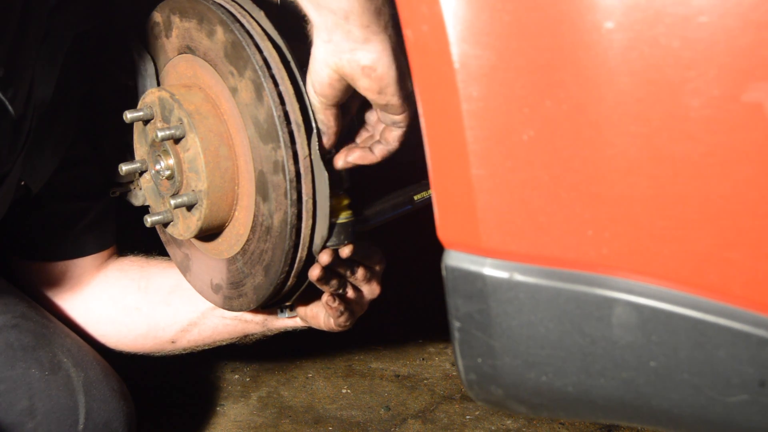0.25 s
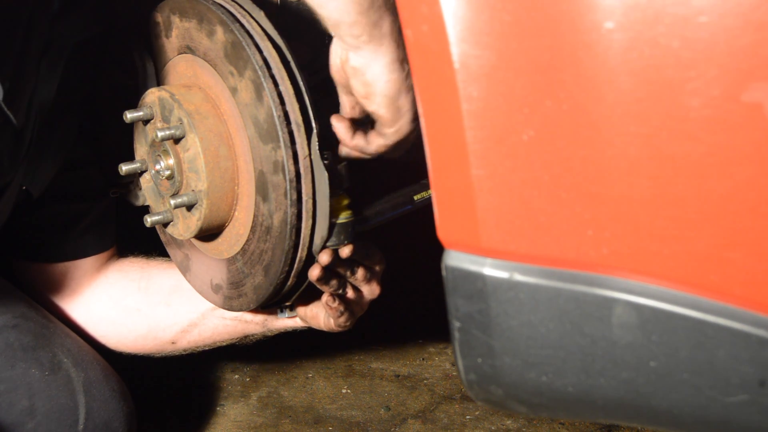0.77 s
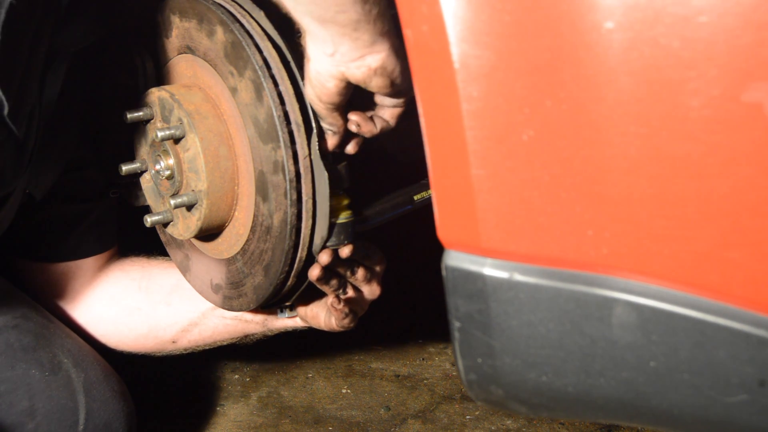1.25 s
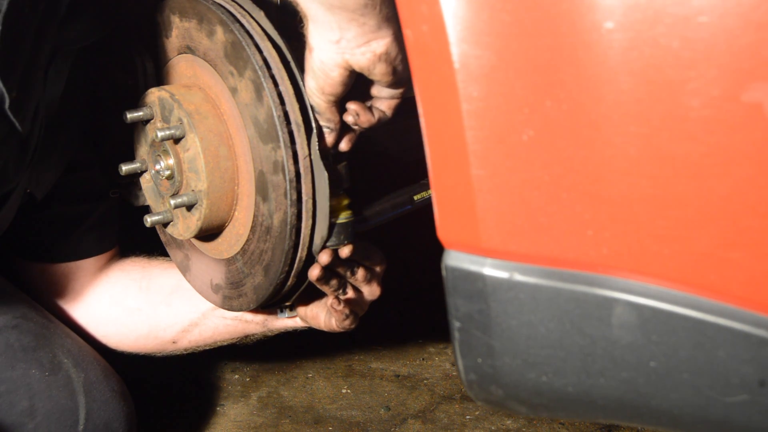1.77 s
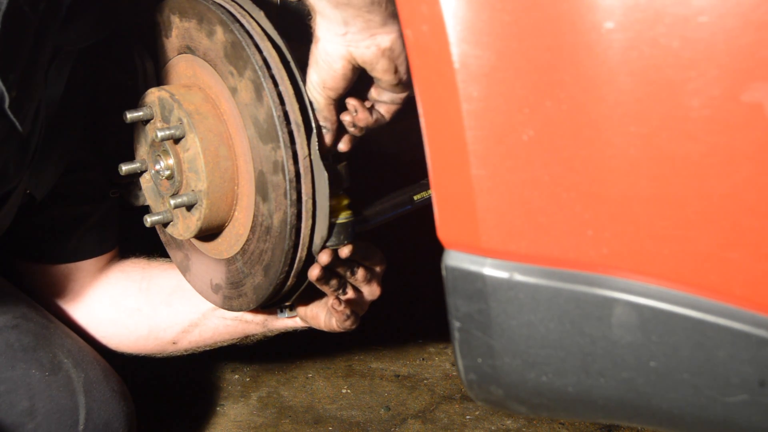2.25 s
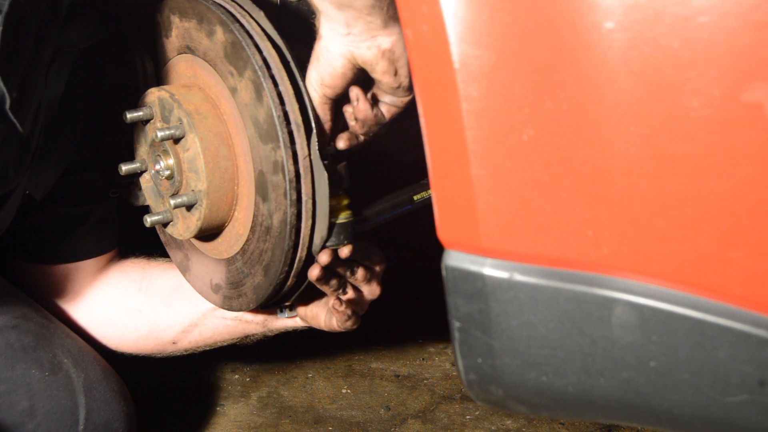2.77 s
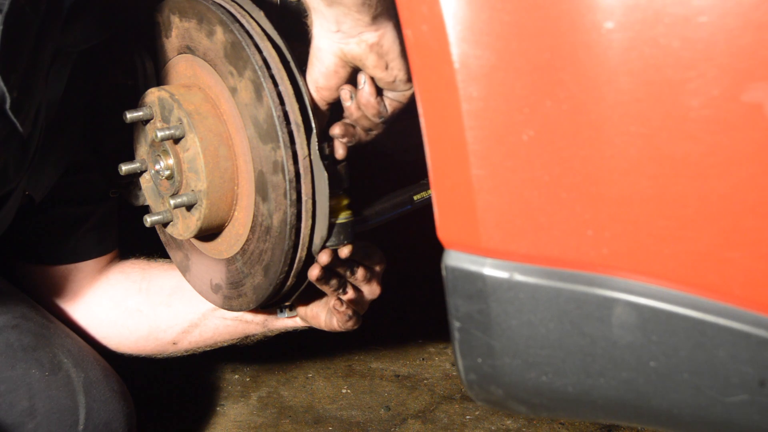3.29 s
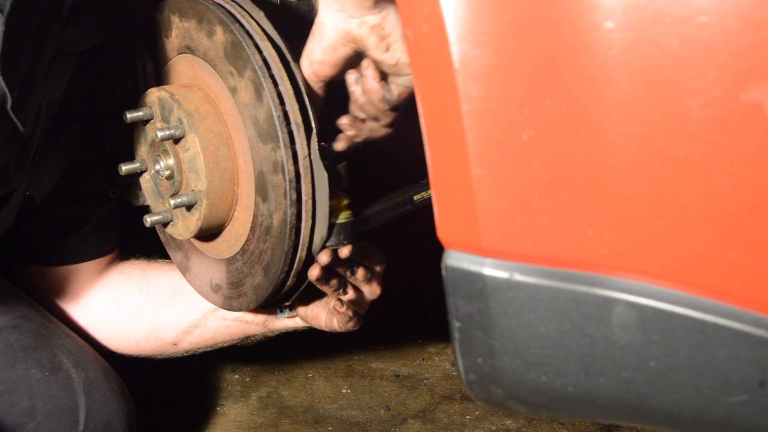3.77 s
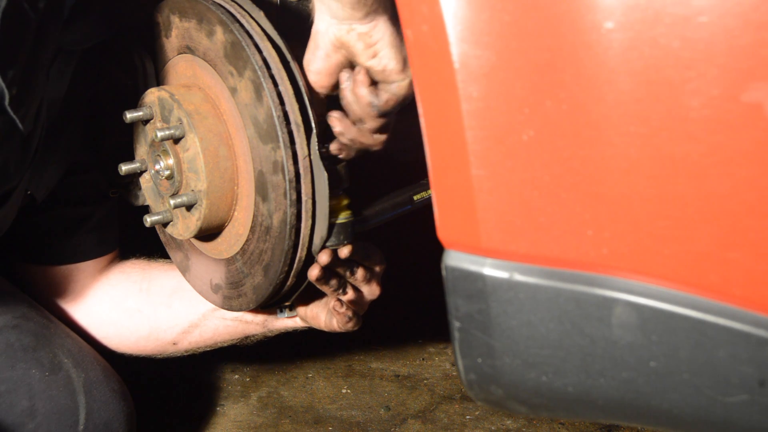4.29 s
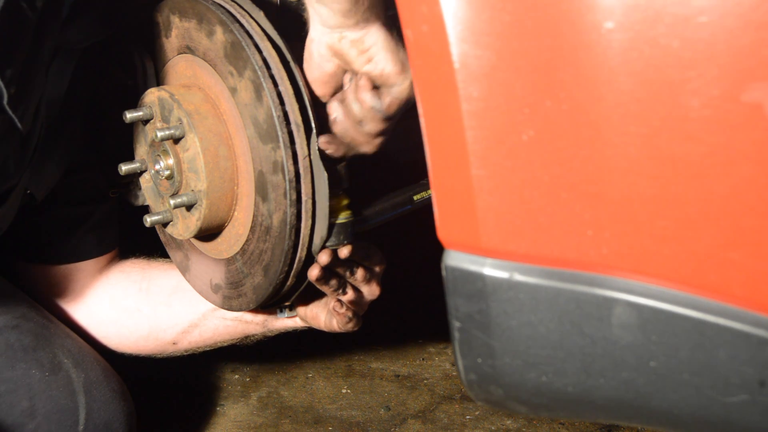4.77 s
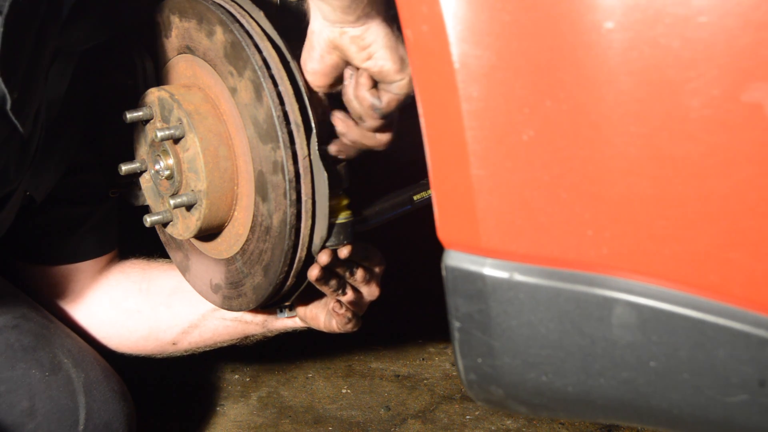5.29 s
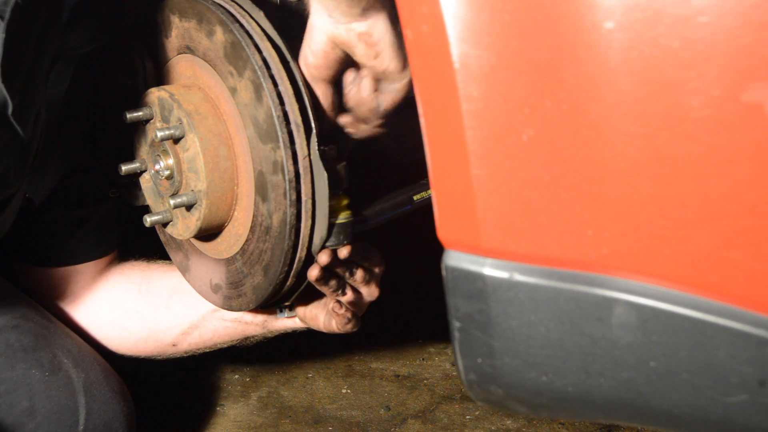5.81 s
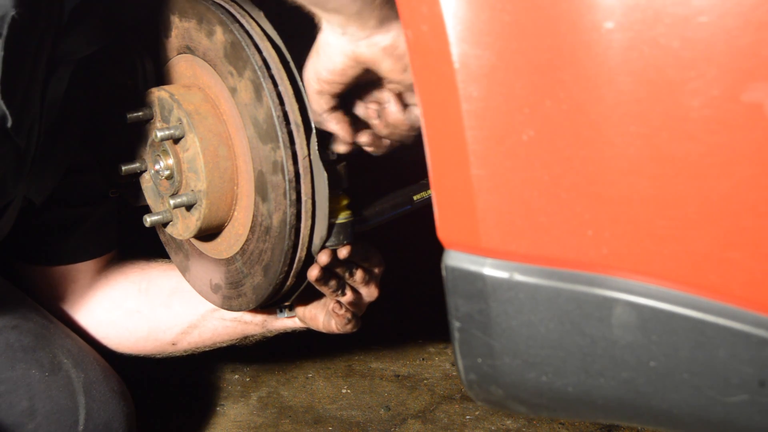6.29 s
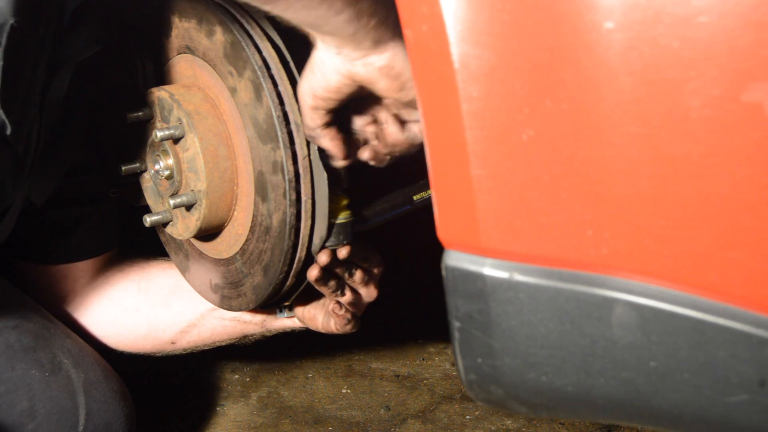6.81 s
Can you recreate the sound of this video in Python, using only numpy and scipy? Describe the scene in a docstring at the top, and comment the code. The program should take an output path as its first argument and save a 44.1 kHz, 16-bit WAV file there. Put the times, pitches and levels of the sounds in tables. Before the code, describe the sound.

A steel nut is turned by hand on a threaded stud, faint ticks and scrapes growing into sharper metallic clicks over garage fan noise.

```python
"""In a garage, behind a brake disc: a steel nut is turned by hand on a threaded stud, close to the microphone.
Taps, scrapes and turns are shaped noise that clicks, rings the steel and fills wheel arch and garage.
Harder knocks ring disc, hub and dust shield as decaying sines; the free nut clinks, the thread squeaks,
the hand thuds on the hub. In the background a rumble is band-passed noise, fan noise and hiss are
coloured noise, and a distant motor and the mains hum in locked multiples."""
import sys
import numpy as np
from scipy import signal
from scipy.fft import rfft, irfft, next_fast_len
from scipy.io import wavfile
from scipy.ndimage import uniform_filter1d, map_coordinates

SR = 44100
rng = np.random.default_rng(int(sys.argv[2]) if len(sys.argv) > 2 else 0)


def unload_wav(signal):
    """Save mono or channel-first audio to the path in sys.argv[1] as 16-bit WAV at rate SR, clipped to [-1, 1]."""
    wavfile.write(
        sys.argv[1],
        SR,
        np.round(np.clip(np.atleast_2d(signal).T, -1, 1) * 32767).astype(np.int16),
    )


N = 310905  # samples in the scene
SPAN = 2 ** 15  # samples given to one sound with its tail
CONTACT_SPAN = SPAN // 4  # longest contact, samples

# taps of nut on stud: t/s, level/dB, bass/dB, middle/dB, treble/dB
TAPS = [(0.152, -32, -12, 6.5, -11), (0.448, -35.5, 1, 1.5, -20), (1.1528, -25, -5.5, -9, -7.5),
        (1.3164, -39, 4.5, -18, -17), (1.3339, -39, -3, -1, -3), (2.7931, -41, -2, -12, -5),
        (2.822, -35.5, 2, -6, 1), (3.432, -43.5, -9, -2, 0), (4.1024, -48.5, -9, 0, 4),
        (4.3145, -44, 8, 3.5, 2.5), (4.947, -41, 7, -3, -8), (5.9152, -28.5, 1.5, 0, -3),
        (6.226, -25, -3.5, -13, -12), (6.2888, -21, -4, -1.5, -1.5), (6.4954, -17.5, -1, 0.5, -5),
        (6.7556, -22.5, -2, 0, -9.5), (6.9465, -44, -9, -4, 0)]
TAP_RISE_S, TAP_HOLD_S, TAP_CONTACT_S = 0.00066, 0.0019, 0.0039


def taps(modes):
    """The nut strikes the stud: pressure starts at once, holds briefly and decays."""
    out, t = np.zeros(N), np.arange(CONTACT_SPAN) / SR
    rise = 1 - np.exp(-t / TAP_RISE_S)
    release = np.exp(-np.maximum(t - TAP_HOLD_S, 0) / TAP_CONTACT_S)
    for s, level_db, *colour in TAPS:
        add(out, s, contact(rise * release, level_db, colour, modes, grit=1.5))
    return out


# the thread catches while the nut turns: t/s of strongest bite, level/dB, bass/dB, treble/dB
SCRAPES = [(0.482, -37.5, -1, -12), (1.8208, -47.5, 0, -8), (2.1864, -46, -6, -9), (2.2134, -45, -5, -8),
           (2.2495, -48, -10, -4), (2.668, -46.5, 4, -22), (2.6908, -49.5, -8, -7), (2.971, -50.5, -4, -4),
           (3.1394, -49.5, -10, -3), (3.4854, -49, 5, -5), (3.9619, -49, 6, -1), (4.0088, -38.5, -8, -9),
           (4.0334, -50, -7, 0), (4.299, -51, 14, -7), (4.3972, -42.5, 6, -3.5), (4.4172, -41, 9.5, -4),
           (4.7003, -44, 0, -12), (4.7327, -40, -4, -12), (4.7627, -46.5, 12.5, -10), (4.962, -49, 11, -6),
           (4.98, -44.5, 15, -2.5), (5.011, -46.5, 8, -8), (5.0314, -43.5, 3, -14),
           (5.0706, -37.5, -3, -16), (5.2915, -48, 7, 2.5), (5.347, -36.5, 5, -15), (5.394, -32.5, -1, -19),
           (5.4834, -46, 5, -19), (5.5784, -44, -7, -12), (5.614, -41, -7, -13), (5.631, -31, -2, -22),
           (5.9972, -42, -7, -9), (6.006, -32.5, 3, -11.5), (6.2954, -24.5, -3, -15),
           (6.7965, -25, -2, -14.5), (6.818, -34.5, 4.5, -9), (6.9969, -41, 1, 5), (7.0111, -36.5, 2, -17),
           (7.0352, -36.5, 3, -12)]
SWELL_S, FADE_S = 0.011, 0.0088  # the swell takes twice SWELL_S; FADE_S is a time constant
MIDDLE_DB, MIDDLE_SHARE = -2, 0.3  # the middle band follows the treble part of the way


def scrapes(modes):
    """Pressure swells as the thread bites and fades as it lets go."""
    out, t = np.zeros(N), np.arange(CONTACT_SPAN) / SR
    bite_s = 2 * SWELL_S
    rise = np.sin(np.pi / 2 * np.minimum(t / bite_s, 1)) ** 3
    bite = rise * np.exp(-np.maximum(t - bite_s, 0) / FADE_S)
    for s, level_db, bass, treble in SCRAPES:
        colour = bass, MIDDLE_DB + MIDDLE_SHARE * treble, treble
        add(out, s - bite_s, contact(bite, level_db, colour, modes, grit=2.8))
    return out


# fingers roll the nut on, the thread whispers:
# start t/s, length/s (cut at CONTACT_SPAN), level/dB, bass/dB, middle/dB, treble/dB
TURNS = [(0.131, 0.045, -48, 5, -11, -12), (0.214, .055, -46, 2.5, -10.5, -17),
         (0.452, 0.044, -39, 0, 1, -13), (0.77, 0.12, -64, -3, -5, 1), (2.124, 0.038, -58, 2, -3, 1),
         (2.689, 0.036, -49, 1, -6, -8), (2.993, 0.2, -61.5, -3, -1, 0), (3.184, 0.063, -58, 0, 3.5, 0),
         (3.44, 0.11, -57.5, -10, 0, -4), (3.809, 0.099, -63, 0, 3, 11), (3.975, 0.053, -49, 14, -1, 1.5),
         (4.251, 0.053, -51.5, 6, -2.5, 4), (4.364, 0.082, -49, 3, 4, -1),
         (4.458, 0.035, -56.5, -11, -8, 6.5), (4.633, 0.047, -55, -9, 5, 5), (4.773, 0.04, -53, -1, -15, 7),
         (4.961, 0.19, -53, 6, -7, -12), (5.243, .11, -59, 6, 2, -2), (5.487, .04, -50, -10, -10, -10),
         (6.256, 0.061, -37, 6, -5, -11), (6.78, .05, -45, -22, 8, -6), (6.969, .04, -46, -2, -10, 6)]
UNEVEN_DB, UNEVEN_S = 3, 0.013  # how much and how fast the drag varies


def turns(modes):
    """The nut drags unevenly along the thread under an arch of pressure."""
    out, t = np.zeros(N), np.arange(CONTACT_SPAN) / SR
    for s, length, level_db, *colour in TURNS:
        knots = rng.standard_normal(64)
        drag = amp(UNEVEN_DB * np.interp(t / UNEVEN_S, np.arange(len(knots)), knots))
        shape = drag * np.sin(np.pi * np.clip(t / length, 0, 1))
        add(out, s, contact(shape, level_db, colour, modes, grit=3.5))
    return out


# nut and stud, damped by the fingers: f/Hz, level/dB, t60/s before the limits in steel_modes
STEEL = [(1074, 7.5, 0.057), (1180, -3, 0.024), (1657, -2, 0.074), (1875, 0.5, 0.18), (2033, 5, 0.069),
         (2540, 4.5, 0.084), (3290, -6, 0.076), (3514, 13.5, 0.083), (3685, 8.5, 0.028), (3810, 3, 0.075),
         (4605, 8, 0.17), (4766, 8, 0.088), (4900, 7, 0.053), (5510, 9, 0.018), (6200, 3, 0.05),
         (6130, 11, 0.049), (6440, 4.5, 0.037), (6580, 2, 0.044), (7750, 7.5, 0.019), (8120, 5, 0.029),
         (8980, 9, 0.023), (9370, 4.5, 0.017), (10250, 3, 0.017), (11100, 4.5, 0.013), (12540, 2, 0.008),
         (12540, 5, .009)]


def steel_modes():
    """Resonance of each steel mode over frequency; a shorter decay widens it."""
    f = np.fft.rfftfreq(SPAN, 1 / SR)
    hz, db, t60 = np.transpose(STEEL)[:, :, None]
    t60 = np.clip(t60, 0.008, 0.06)
    width = np.log(1000) / np.pi / t60
    return amp(db) * 1j * f * width / (hz ** 2 - f ** 2 + 1j * f * width)


# colour of a contact, f/Hz: low edge, bass, peak, middle, treble, high edge
BANDS_HZ = [500, 1700, 3400, 5600, 10000, 15500]
LOW_EDGE_DB, HIGH_EDGE_DB = -16, -18  # relative to bass and treble
# the wheel arch, close by: f/Hz, t60/s
ARCH = [(500, 0.8), (2000, 0.15), (5500, 0.11), (14000, 0.04)]
# the garage walls, farther off: f/Hz, t60/s
WALLS = [(500, 0.56), (2000, 0.39), (5500, 0.25), (14000, 0.29)]


def contact(shape, db, colour, modes, grit):
    """Tiny thread impacts under a pressure shape click, ring the steel and fill arch and garage."""
    hz = np.fft.rfftfreq(SPAN, 1 / SR)
    # burrs on the thread catch in clumps about a millisecond long
    burrs = amp(grit * unit(uniform_filter1d(rng.standard_normal(len(shape)), size=40)))
    force = rfft(shape * burrs * rng.standard_normal(len(shape)), SPAN)
    # many impacts together spread their energy evenly over frequency
    energy = uniform_filter1d(np.abs(force) ** 2, size=400)
    force *= np.linalg.norm(shape) / np.sqrt(energy)
    low, mid, high = colour
    levels = [low + LOW_EDGE_DB, low, 0, mid, high, high + HIGH_EDGE_DB]
    click = force * causal(along(list(zip(BANDS_HZ, levels)), hz))
    # each contact meets the modes at slightly new strengths
    ring = amp(rng.normal(0, 2.2, len(modes))) @ modes
    near = (1 + ring) * (1 + amp(-5.5) * tail(ARCH))
    # the walls hear many loose parts rattle along, so the modes blur
    blurred = 1 + 0.6 * ring
    far = blurred * amp(-5.5) * tail(WALLS)
    return amp(db) * irfft(click * (near + far))


# knocks hard enough to ring the big parts: t/s, disc level/dB, hub level/dB, shield level/dB
KNOCKS = [(0.4844, -61, -40.5, -46.5), (2.8218, -66, -47.5, -68), (4.4244, -61, -63, -62),
          (5.0744, -64, -72, -54), (5.3944, -57, -58, -56), (5.6266, -54.5, -60, -60),
          (5.914, -55.5, -47, -48.5), (6.0072, -66, -46, -43.5), (6.2264, -63, -42, -45),
          (6.2853, -56, -34, -33.5), (6.4964, -49.5, -27.5, -41), (6.757, -48, -34.5, -34),
          (6.8044, -43, -41, -34), (6.9944, -58, -44, -63)]
# brake disc: f/Hz, level/dB, t60/s
DISC = [(2296, 7.5, 0.57)]
# hub: f/Hz, level/dB, t60/s
HUB = [(2913, 0, .2), (2772, -8, .2), (3048, -6, .13), (3237, -10, .16), (3552, -9, .18), (3852, -5, .15),
       (4554, -9, .16)]
# dust shield: f/Hz, level/dB, t60/s
SHIELD = [(1960, 0, .22), (2046, -1, .19), (1235, -5, .22), (1710, -5, .16), (1810, -8, .15),
          (1915, -4, .16), (2095, -6, .18), (2493, -6, .2)]


def knocks():
    """Disc, hub and shield ring with their own modes; the walls answer hub and shield."""
    out, t = np.zeros(N), np.arange(SPAN) / SR
    for s, disc_db, hub_db, shield_db in KNOCKS:
        ring = onset(t) * (ringing(HUB, hub_db, t) + ringing(SHIELD, shield_db, t))
        add(out, s, irfft(rfft(ring) * (1 + amp(-9.0) * tail(WALLS))))
        for hz, db, t60 in DISC:
            decay = amp(disc_db + db - 60 * t / t60)
            add(out, s, onset(t) * decay * np.sin(2 * np.pi * hz * t))
    return out


# the nut, lifted off, clinks freely: t/s, level/dB
CLINKS = [(6.944, -49), (6.990, -36.5), (7.004, -42)]
# the free nut: f/Hz, level/dB, t60/s
FREE_NUT = [(4942, 3, 0.11), (6970, -7, .2), (7700, -18, .12), (8600, -8, .06), (9650, 7, 0.064)]


def clinks():
    """The lifted nut rings with modes of its own."""
    out, t = np.zeros(N), np.arange(SPAN) / SR
    for s, db in CLINKS:
        add(out, s, onset(t) * ringing(FREE_NUT, db, t))
    return out


# a thin squeak of the thread: t/s, fundamental f/Hz, level/dB
SQUEAK = [(6.845, 1770, -85), (6.865, 1810, -66), (6.89, 1975, -63), (6.91, 2040, -60), (6.94, 2020, -63),
          (6.965, 1940, -66), (6.98, 1900, -85)]
# what sounds of it: multiple of the fundamental, level/dB
OVERTONES = [(5, -5), (6, 0)]


def squeak():
    """Two high overtones of a stick-slip glide, unsteady in pitch and level."""
    s, hz, db = np.transpose(SQUEAK)
    t = np.arange(N) / SR
    pitch = np.interp(t, s, hz) * (1 + 0.003 * wobble(300))
    cycles = np.cumsum(pitch) / SR
    tone = sum(amp(level + 3 * wobble(90)) * np.sin(2 * np.pi * k * cycles) for k, level in OVERTONES)
    return amp(np.interp(t, s, db, -200, -200)) * tone


# the hand bumps the hub: t/s, level/dB, f/Hz, t60/s
THUDS = [(4.267, -43, 130, 0.14), (6.509, -53, 119, 0.19), (6.989, -42, 182.5, 0.25)]


def thuds():
    """Each soft low knock is one decaying sine with a slow onset."""
    out, t = np.zeros(N), np.arange(SR // 3) / SR
    for s, db, hz, t60 in THUDS:
        rise = 1 - np.exp(-t / 0.015)
        add(out, s, amp(db - 60 * t / t60) * np.sin(2 * np.pi * hz * t) * rise)
    return out


# a low rumble: t/s, level/dB
RUMBLE = [(3.7, -77), (3.77, -81), (3.86, -63), (3.97, -80), (4.31, -62), (4.36, -65.5), (5.14, -71),
          (5.41, -60.5), (5.92, -79), (6.22, -67), (6.41, -72), (6.529, -56), (6.65, -76), (7.05, -62)]


def rumble():
    """Low band-passed noise that swells and sinks."""
    band = signal.butter(2, [75, 140], "bandpass", fs=SR, output="sos")
    s, db = np.transpose(RUMBLE)
    level = amp(np.interp(np.arange(N) / SR, s, db, -200))
    return level * unit(signal.sosfilt(band, rng.standard_normal(N)))


# colour of fan noise and hiss: f/Hz, relative level/dB per Hz
AIR = [(12, -35), (30, -9), (60, -5), (95, 0), (200, -3), (355, -2.5), (570, -2.5), (754, -3.5), (1020, -3),
       (1790, -9), (2500, -7), (3500, -12), (6470, -16), (15800, -20)]
AIR_DB = -51  # rms
# the fan's drone: f/Hz, width/Hz, lift/dB
DUCT = [(435, 22, 5), (495, 34, 8), (531, 25, -9), (553, 26, 8.5), (593, 16, 6.5), (1140, 270, 1),
        (1400, 300, 2), (2074, 37, 6.5), (2490, 200, 4), (5120, 920, 5.5)]


def fan():
    """Fan noise lifted at its duct resonances merges into the microphone's hiss."""
    m = next_fast_len(N)
    hz = np.fft.rfftfreq(m, 1 / SR)
    lift = sum(db / (1 + (2 * (hz - centre) / width) ** 2) for centre, width, db in DUCT)
    air = irfft(rfft(rng.standard_normal(m)) * amp(along(AIR, hz) + lift), m)[:N]
    return amp(AIR_DB) * amp(0.3 * wobble(3)) * unit(air)


# distant motor: multiple of its rotation, level/dB rms
MOTOR = [(1, -70), (2, -75), (5, -78), (6, -77), (15, -75), (16, -76), (17, -75), (18, -67.5), (19, -65),
         (20, -71), (21, -74), (23, -74), (24, -73), (27, -74), (38, -75), (40, -77)]
# mains: multiple of its frequency, level/dB rms
MAINS = [(1, -67), (3, -79), (4, -77), (10, -74), (12, -78)]
MOTOR_HZ, MAINS_HZ = 54.97, 60.01
CREST_S = 0.077  # motor and mains beat five times a second, crests together here


def hums():
    """The distant motor and the mains lie over each other and beat."""
    return hum(MOTOR_HZ, MOTOR) + hum(MAINS_HZ, MAINS)


def hum(hz, orders):
    """Steady multiples of one frequency, locked into a pulse, each breathing a little."""
    turn = 2 * np.pi * hz * (np.arange(N) / SR - CREST_S)
    return sum(np.sqrt(2) * amp(db + 1.2 * wobble(4.7)) * np.cos(k * turn) for k, db in orders)


def tail(decays):
    """Spectrum of a fresh diffuse tail of energy 1; each frequency dies at its own speed."""
    hz, t, z = signal.stft(rng.standard_normal(SPAN // 2), SR, nperseg=256)
    decay = amp(-60 * t / along(decays, hz)[:, None])
    x = signal.istft(z * decay, SR, nperseg=256)[1]
    return rfft(x / np.linalg.norm(x), SPAN)


def ringing(modes, level_db, t):
    """One blow on a set of modes, with slightly new strengths and random phases."""
    out = 0
    for hz, db, t60 in modes:
        decay = amp(level_db + db + rng.normal(0, 0.55) - 60 * t / t60)
        out = out + decay * np.sin(2 * np.pi * hz * t + rng.uniform(0, 2 * np.pi))
    return out


def onset(t):
    """A ring builds up over a few milliseconds."""
    return 1 - np.exp(-t / 0.0041)


def amp(db):
    """Decibels to gain."""
    return 10 ** (np.asarray(db) / 20)


def unit(x):
    """Scaled to rms 1."""
    return x / np.sqrt(np.mean(x ** 2) + 1e-20)


def along(points, hz):
    """Interpolates (f/Hz, value) points on a log frequency axis."""
    f, v = np.transpose(points)
    return np.interp(np.log(hz + 1), np.log(f + 1), v)


def wobble(rate):
    """A random curve of straight pieces, rate knots a second."""
    knots = rng.standard_normal(int(N * rate / SR) + 4)
    return map_coordinates(knots, [np.arange(N) * rate / SR], order=1)


def add(track, s, sound):
    """Mixes a sound in at a time in seconds."""
    part = track[round(s * SR):][:len(sound)]
    part += sound[:len(part)]


def causal(gain_db):
    """The minimum-phase response with this gain, by folding the cepstrum."""
    c = irfft(np.log(amp(gain_db)))
    c[1:len(c) // 2] *= 2
    c[len(c) // 2 + 1:] = 0
    return np.exp(rfft(c))


def scene():
    """All sources at one microphone."""
    modes = steel_modes()
    nut = taps(modes) + scrapes(modes) + turns(modes)
    background = rumble() + fan() + hums()
    return (nut + knocks() + clinks() + squeak() + thuds() + background)[None]


TOP_HZ = 15830


def record(dry):
    """The microphone chain keeps nothing from TOP_HZ upward."""
    m = next_fast_len(N + 4096)
    passed = np.fft.rfftfreq(m, 1 / SR) < TOP_HZ
    return irfft(rfft(dry, m) * passed, m)[:, :N]


dry = scene()
out = record(dry)
unload_wav(out)
```